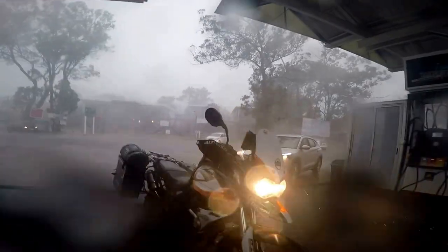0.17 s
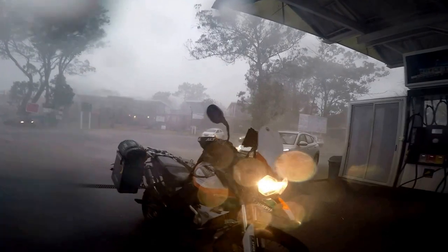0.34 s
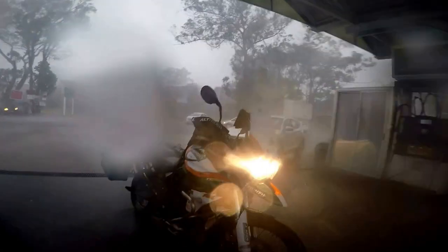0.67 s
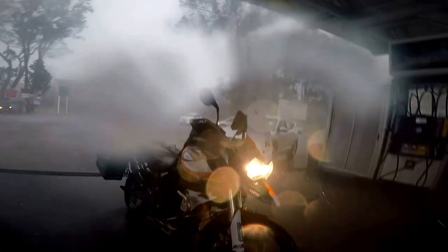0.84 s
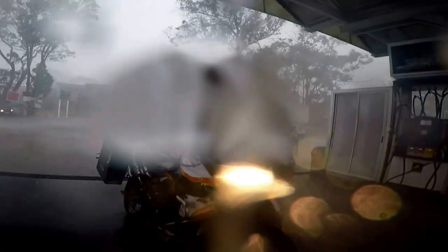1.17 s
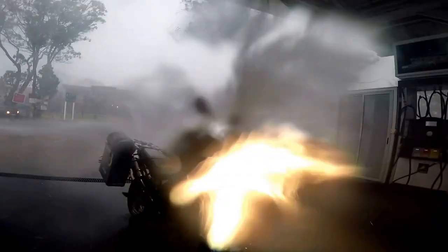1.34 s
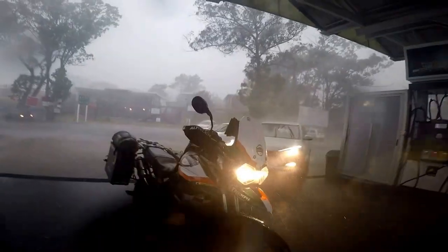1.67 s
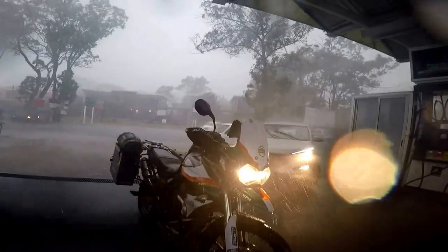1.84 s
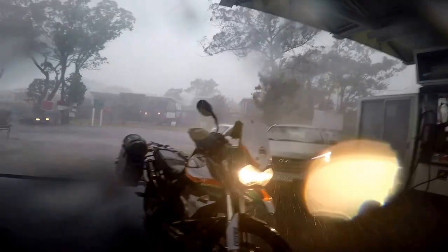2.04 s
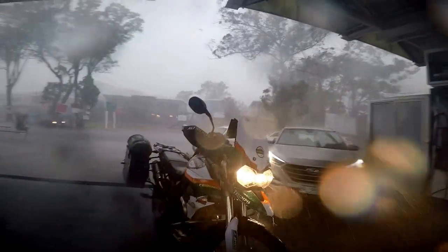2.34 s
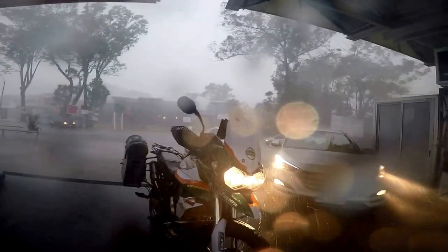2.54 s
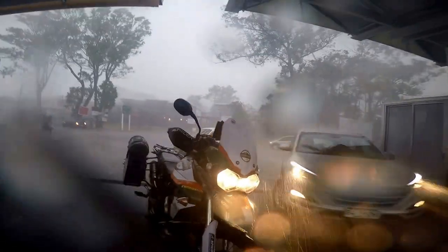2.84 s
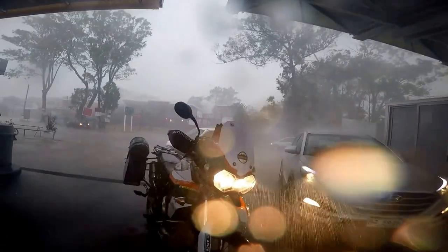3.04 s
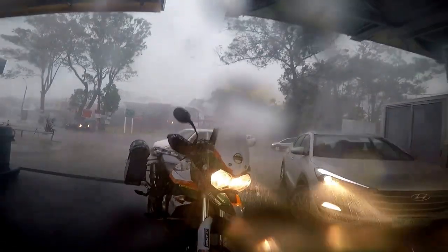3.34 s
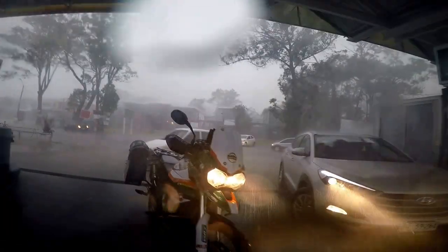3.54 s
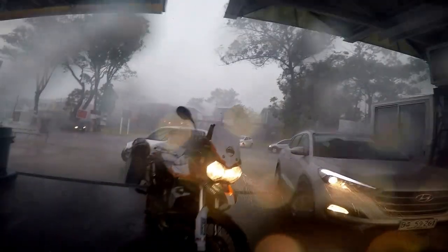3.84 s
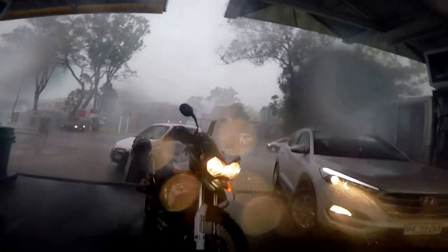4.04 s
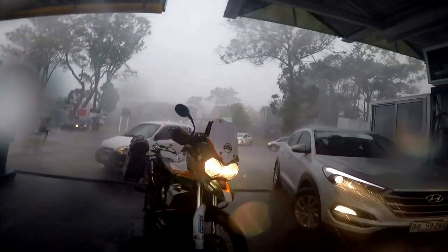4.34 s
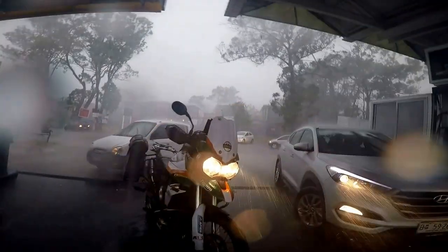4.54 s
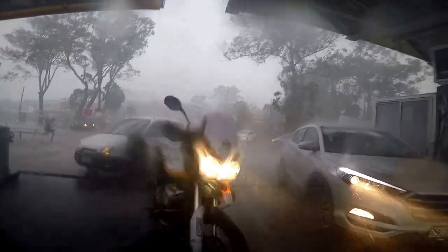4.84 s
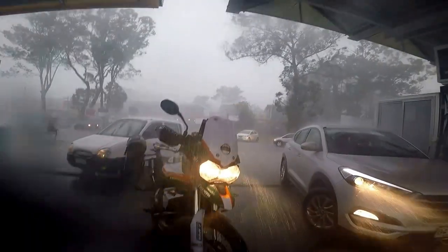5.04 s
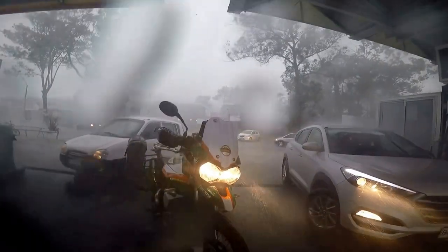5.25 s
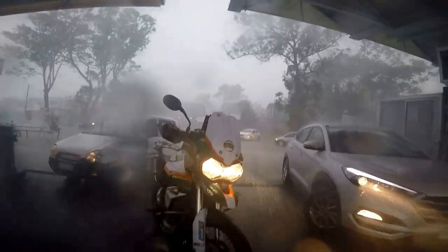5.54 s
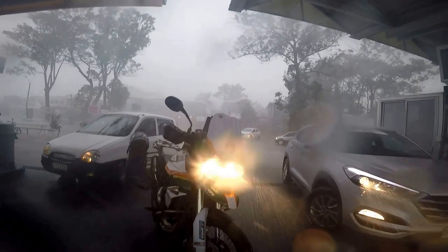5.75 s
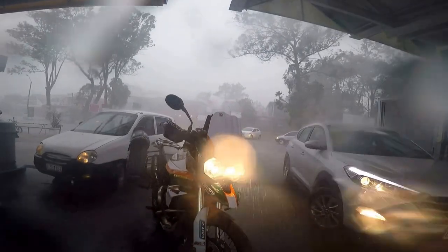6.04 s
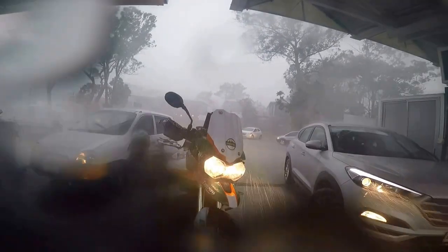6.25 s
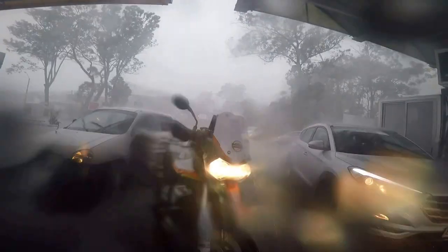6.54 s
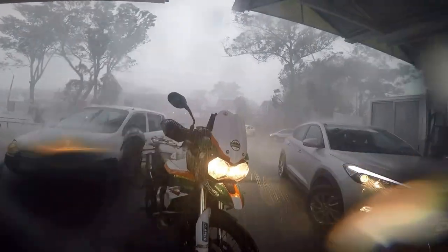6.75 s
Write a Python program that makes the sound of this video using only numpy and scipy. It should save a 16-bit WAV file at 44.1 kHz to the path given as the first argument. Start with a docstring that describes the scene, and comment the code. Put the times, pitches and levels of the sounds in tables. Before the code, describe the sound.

A violent rain and hail storm on a covered forecourt, picked up by a small hard-cased microphone right in the weather. Throughout, a thick flickering roar combines low roof drumming with high hiss, overlaid by fine bright drop ticks and dense pattering of small stones. Wind rumbles in uneven lumps, with hard low punches around 0.4-0.5, 0.8, 1.4, 2.9, 3.8 and strongly at 4.25 seconds. Larger stones clack with short, dry, hollow rings, clustering around 1.6-2.0 and becoming louder from 2.0 to 3.7, then again near 4.5. At 4.65 a heavy wet smack with a thump shuts the sound down; it drains back, reopens at 5.08 and is almost immediately muffled again until 5.4. Knocks follow, then another big splash at 5.6 mutes it until about 6.0. The full roar returns, with a flurry of hail knocks from 6.4 to 6.8 and wind swelling at the end.

```python
"""Hail and heavy rain roar on a forecourt roof, as filtered noise in five flickering bands.
Stones tick on a hard microphone housing and ring its modes; fine drops burst as bright ticks.
Wind buffets and punches the microphone membrane as low noise and spikes; a few blows splash on the port.
Three times roar, small ticks and wind dip, as if water shut the port, and come back abruptly."""
import sys
import numpy as np
from scipy import signal
from scipy.fft import rfft, irfft, next_fast_len
from scipy.io import wavfile
from scipy.ndimage import uniform_filter1d

SR = 44100
rng = np.random.default_rng(int(sys.argv[2]) if len(sys.argv) > 2 else 0)


def bounce(signal):
    """Save signal as a 16-bit WAV file at the path given by the first command-line argument."""
    frames = np.transpose(np.atleast_2d(signal))
    limited = np.clip(frames, -1, 1)
    pcm = np.round(limited * 32767).astype(np.int16)
    wavfile.write(sys.argv[1], SR, pcm)


N = 304731


def undb(db):
    """Amplitude factor of a level in dB."""
    return 10 ** (np.asarray(db) / 20)


def unit(x):
    """x scaled to an RMS of 1."""
    return x / np.sqrt(np.mean(x ** 2))


def peak(x):
    """x scaled to a peak of 1."""
    return x / abs(x).max()


def curve(rows):
    """Columns of a table, joined by straight lines, one value a sample."""
    time_s, *columns = np.transpose(rows)
    return [np.interp(np.arange(N) / SR, time_s, column) for column in columns]


def walk(rate_hz):
    """Random levels held 1 / rate_hz s and smoothed twice."""
    hold = int(SR / rate_hz)
    steps = np.repeat(rng.standard_normal(N // hold + 1), hold)
    return 1.08 * uniform_filter1d(uniform_filter1d(steps, hold), hold)[:N]


def coloured(x, points, lo_hz, hi_hz):
    """x with the spectrum of (frequency [Hz], level [dB]) points, faded in at lo_hz and out at hi_hz."""
    n = next_fast_len(N)
    hz = np.arange(n // 2 + 1) * SR / n + 1e-3  # offset avoids log(0)
    point_hz, point_db = np.array(points).T
    gain = undb(np.interp(np.log(hz), np.log(point_hz), point_db))
    edges = np.sqrt(1 / (1 + (lo_hz / hz) ** 4) / (1 + (hz / hi_hz) ** 4))
    return irfft(rfft(x, n) * gain * edges, n)[:N]


def ring(x, hz, t60_s):
    """One decaying mode driven by x: a complex one-pole resonator."""
    pole = np.exp((2j * np.pi * hz - np.log(1000) / t60_s) / SR)
    return signal.lfilter([1], [1, -pole], x + 0j).imag


def struck(blow, modes, loud_hz, fall_db, damp):
    """Modes rung by blow(hz), fall_db weaker per octave from loud_hz, t60 times damp, pitch jittered."""
    jitter = 1 + 0.04 * rng.standard_normal(len(modes))
    out = 0
    for (hz, mode_db, t60_s), shift in zip(modes, jitter):
        level_db = mode_db - fall_db * abs(np.log2(hz / loud_hz))
        out = out + undb(level_db) * peak(ring(blow(hz), hz * shift, damp * t60_s))
    return peak(out)


def add(out, time_s, sound):
    """Mix sound into out at time_s."""
    i = int(time_s * SR)
    out[i:i + len(sound)] += sound[:N - i]


# water over the port: (shuts [s], clear again [s], nominal depth [dB], clearing time [s])
COVERINGS = [(4.647, 5.083, -22.5, 0.032), (5.09, 5.413, -18, 0.012), (5.61, 6.026, -26, 0.048)]


def dips():
    """Level change in dB while water covers the port: shuts fast, drains slowly, then clears."""
    shut_s, settle_db, settle_s = 0.012, 13.5, 0.04
    drain_db_per_s = 19
    t, out = np.arange(N) / SR, 0
    for shuts_s, clear_s, depth_db, clearing_s in COVERINGS:
        since = t - shuts_s
        cover = np.clip(np.minimum(since / shut_s, (clear_s - t) / clearing_s), 0, 1)
        settling_db = settle_db * np.exp(-abs(since) / settle_s)  # last part of the depth comes slowly
        out = out + cover * (depth_db + drain_db_per_s * since + settling_db)
    return out


# wind buffeting with the port open: (time [s], level [dB])
GUST_LEVELS = [(0.0, -15.5), (0.12, -9.5), (0.26, -21.5), (0.38, -12.5), (0.53, -9.5), (0.6, -22),
               (0.85, -17.5), (1.15, -16), (1.3, -10.5), (1.58, -17), (1.72, -14.5), (1.85, -17.5),
               (2.1, -14), (2.27, -23.5), (2.55, -15), (2.87, -20.5), (2.95, -13), (3.3, -19.5),
               (3.79, -13), (4.05, -21), (4.25, -12), (4.48, -23), (4.57, -15.5), (4.86, -15), (5.0, -27),
               (5.09, -14), (5.35, -21.5), (5.42, -10.5), (5.61, -20.5), (6.1, -31.5), (6.18, -17.5),
               (6.5, -12.5), (6.82, -22), (6.91, -8)]
# relative spectrum of the buffeting: (frequency [Hz], density [dB per Hz])
BUFFET_COLOUR = [(12, -22), (20, 10.5), (45, 1.5), (382, -22.5), (500, -26), (650, -68)]


def wind(dip_db):
    """Eddies push the membrane in lumps; faster flutter follows the lumps in bursts."""
    gust_db = curve(GUST_LEVELS)[0] + 0.69 * dip_db  # dips reach the wind less
    lumps = walk(22)
    slow = coloured(rng.standard_normal(N), BUFFET_COLOUR, 8.8, 123) * undb(3.9 * lumps)
    flutter_db = 3.6 * lumps + 3.8 * walk(45) + 4.5
    flutter = coloured(rng.standard_normal(N), BUFFET_COLOUR, 62.0, 760) * undb(flutter_db)
    push = slow + flutter
    push = push * abs(push) ** 0.19  # sharpens strong eddies
    running_rms = np.sqrt(uniform_filter1d(push ** 2, int(0.1 * SR)))
    return push / running_rms * undb(gust_db)


# strong single eddies: (time [s], signed peak [full scale])
EDDIES = [(0.116, -0.23), (0.373, -0.72), (0.41, -0.6), (0.468, -0.48), (0.49, -0.65), (0.533, 0.49),
          (0.843, 0.64), (1.214, -0.24), (1.236, 0.23), (1.248, -0.44), (1.359, -0.7), (1.671, 0.36),
          (1.768, 0.46), (2.531, 0.32), (2.939, 0.57), (3.787, 0.52), (4.255, -0.84), (5.082, -0.41),
          (5.088, 0.4), (5.101, -0.53)]


def punches():
    """Each eddy is a sharp spike of pressure between two broad rebounds."""
    spike_s, rebound_s = 0.0022, 0.013  # half-widths
    out, t = np.zeros(N), np.arange(-2000, 2000) / SR
    spike = np.exp(-abs(t / spike_s) ** 1.13)
    rebound = 0.39 * np.exp(-(t / rebound_s) ** 2)
    for time_s, push in EDDIES:
        add(out, time_s + t[0], push * peak(spike - rebound))
    return out


def spray(near_db):
    """Fine drops burst close by: equal, thin, bright noise ticks that the dips hide slightly less."""
    count, decay_s = 1100, 0.00074  # decay time constant
    at = (rng.random(count) * N).astype(int)
    ticks = np.bincount(at, minlength=N).astype(float)
    envelope = signal.lfilter([1], [1, -np.exp(-1 / (decay_s * SR))], ticks)
    burst = envelope * rng.standard_normal(N)
    burst = coloured(burst, [(5000, 0), (15000, -12)], 6000, 13000)
    return unit(burst) * undb(0.94 * near_db - 18)


# share of each housing mode in the small ticks, in mode order: (level [dB])
TICK_SHARES = [-15, -8.5, 3, 0, -2.5, -7, -23, -4, -7, 0, -3, -15, -22]


def patter(near_db):
    """Small stones on the housing: mostly faint, a few strong, each ringing its own mix of modes."""
    count = 2100
    at = (rng.random(count) * N).astype(int)
    size = undb(np.minimum(-3.5 * np.log(1 - rng.random(count)), 11))
    mix = rng.standard_normal((len(HOUSING_MODES), count))
    out = 0
    for (hz, _, t60_s), share_db, share in zip(HOUSING_MODES, TICK_SHARES, mix):
        for place, shift in enumerate([0.9, 1, 1.1]):  # where a stone lands shifts the ring
            hits = np.bincount(at[place::3], (size * share)[place::3], N)
            out = out + undb(share_db) * ring(hits, hz * shift, 0.68 * t60_s)
    softened = np.convolve(out, np.hanning(5), "same")
    return unit(softened) * undb(near_db - 1)


# nominal modes of the housing: (frequency [Hz], level [dB], t60 [s])
HOUSING_MODES = [(740, -17, 0.024), (1090, -5.5, 0.03), (1546, -0.5, 0.01), (2248, 6.5, 0.019),
                 (2383, 5.5, 0.02), (2785, 2.5, 0.025), (3400, -2, 0.0059), (3800, 10.5, 0.02),
                 (4250, 3, 0.013), (5550, -2, 0.011), (6930, -5.5, 0.0046), (9650, -13.5, 0.0042),
                 (13000, -27, 0.003)]
# loud stones: (time [s], body peak [dB], favoured ring [Hz], crack re body [dB])
LOUD_STONES = [(0.087, -7.5, 3820, -24), (0.407, -10, 2220, -25), (0.499, -6, 2260, -30),
               (0.7668, -6, 1550, -38), (0.918, -9.5, 2230, -17), (0.9521, -8, 1340, -26),
               (0.9773, -11, 2220, -25), (0.994, -11.5, 2190, -31), (1.1236, -13, 2170, -6),
               (1.5454, -14, 2220, -26), (1.6256, -14, 1330, -24), (1.669, -7, 1700, -26),
               (1.6854, -10, 2210, -29), (1.699, -6, 2200, -32), (1.7359, -9, 2220, -33),
               (1.8945, -7.5, 2240, -34), (1.923, -8, 1440, -30), (1.9837, -10, 2200, -26),
               (2.0637, 1.5, 4060, -34), (2.1932, -1.5, 4050, -38), (2.4149, -6.5, 2110, -28),
               (2.537, -6, 1420, -30), (2.5896, -5, 2480, -31), (2.69, -5.5, 1980, -26),
               (2.781, -1, 2180, -32), (2.8625, 1.5, 2090, -12), (3.0817, -9, 2030, -27),
               (3.151, -8, 4210, -25), (3.2352, 0.5, 2220, -20), (3.347, -16, 2500, -22),
               (3.3627, 0.5, 2260, -34), (3.4021, -1.5, 2320, -31), (3.541, -7, 4030, -29),
               (3.5742, -1.5, 2040, -33), (3.716, -4, 3650, -36), (4.5052, -3, 1550, -24),
               (4.5505, -3.5, 4140, -19), (4.5846, 2.5, 2220, -21), (4.8047, -21, 1800, -31),
               (5.1744, -17, 2150, -27), (5.413, -7.5, 2620, -11), (5.44, 0, 1780, -16),
               (5.4687, -9, 2230, -24), (5.5696, -5, 2350, -18), (6.3916, -7, 2350, -18),
               (6.4254, -3, 2220, -22), (6.5125, -4, 4030, -31), (6.5312, -2.5, 1510, -35),
               (6.5755, -8, 2300, -6), (6.5993, -7.5, 1370, -27), (6.6538, -7, 3860, -29),
               (6.7722, -1, 1670, -34)]


def stones():
    """A short crunch of ice rings the housing, favouring modes near one pitch, and cracks in the treble."""
    out, t = np.zeros(N), np.arange(1500) / SR
    for time_s, peak_db, loud_hz, crack_db in LOUD_STONES:
        grit = rng.standard_normal(len(t)) * np.sqrt(t) * np.exp(-t / 0.0009)
        body = struck(lambda hz: grit, HOUSING_MODES[:-2], loud_hz, 9, 0.5)
        crack = struck(lambda hz: grit, HOUSING_MODES[-3:], 10400, 2.7, 0.91)
        add(out, time_s, undb(peak_db) * (body + undb(crack_db) * crack))
    return out


# blows on the port: (time [s], splash peak [dB], splash t60 at 2200 Hz before ringing [s],
# favoured ring [Hz], crack re splash [dB], thump [dB], thump pitch [Hz])
PORT_BLOWS = [(4.6571, 10, 0.021, 1880, -7, 0.5, 43.4), (5.159, -9, 0.014, 3470, 0.5, -11, 60),
              (5.619, 12.5, 0.019, 3000, -26, 2, 44.6), (5.7047, -3, 0.014, 4070, -4, -35, 60)]


def smacks():
    """Ice or water bursts on the port: a crack, a splash that dulls as it fades and a low membrane thump."""
    out, t = np.zeros(N), np.arange(4000) / SR
    for time_s, splash_db, t60_s, loud_hz, crack_db, thump_db, thump_hz in PORT_BLOWS:
        hiss = rng.standard_normal(len(t))
        noise = np.convolve(hiss, np.hanning(5), "same")
        snap = hiss * np.exp(-t / 0.00064)

        def fading(hz):
            """Noise that dies sooner for higher modes."""
            return noise * 1000.0 ** (-t * (hz / 2200) ** 0.55 / t60_s)

        crack = struck(lambda hz: snap, HOUSING_MODES[-3:], 9000, 0, 0.75)
        splash = struck(fading, HOUSING_MODES, loud_hz, 15, 0.29)
        thump = np.sin(2 * np.pi * thump_hz * t) * np.exp(-t / (0.59 * t60_s))
        burst = undb(splash_db) * (splash + undb(crack_db) * crack)
        add(out, time_s, burst + undb(thump_db) * thump)
    return out


# relative spectrum of the roar through the housing: (frequency [Hz], density [dB per Hz])
ROAR_COLOUR = [(250, -18), (450, -6.5), (690, 3.5), (1000, -10), (1800, -17.5), (2500, -25), (3250, -31),
               (4000, -16.5), (5800, -19.5), (6500, -31.5), (7100, -28.5), (8600, -34.5), (9300, -46.5),
               (11000, -39), (15000, -48.5)]


def roar(drum_db, hiss_db):
    """Countless drops on roof and ground: low drumming and high hiss as noise bands that flicker apart."""
    edges_hz = [100, 1000, 1900, 3200, 6500, 30000]
    flickers_db = [1.78, 0.8, 3.6, 1.14, 1.9]
    swell, scale, out = walk(9.5), None, 0
    for lo_hz, hi_hz, flicker_db in zip(edges_hz, edges_hz[1:], flickers_db):
        band = coloured(rng.standard_normal(N), ROAR_COLOUR, lo_hz, hi_hz)
        if scale is None:
            scale = 1 / band.std()  # the lowest band sets the scale for all
        share = np.clip(np.log(lo_hz / 600) / np.log(5), 0, 1)  # higher bands follow the hiss more
        band_db = (1 - share) * drum_db + share * (hiss_db + 10.5)
        out = out + scale * band * undb(band_db + 0.097 * swell + flicker_db * walk(30))
    return out


# storm with the port open: (time [s], nominal drumming level [dB], nominal hiss level [dB])
STORM = [(0.0, -21, -30), (0.79, -22.5, -35.5), (1.15, -21.5, -29.5), (1.7, -21, -33), (1.9, -21, -31),
         (2.5, -19, -27.5), (3.07, -18, -27.5), (3.66, -21.5, -29.5), (4.31, -18, -27), (4.65, -20, -29),
         (5.09, -20.5, -31.5), (5.5, -19, -27), (6.05, -23, -31.5), (6.3, -19, -30.5), (6.91, -21.5, -28.5)]
# flurries of small stones and drops: (time [s], level re hiss [dB])
FLURRIES = [(0.0, 1.5), (0.55, 2.5), (0.65, 6), (1.45, -3.5), (1.7, 5), (2.1, -4), (3.0, -4.5), (3.2, 4.5),
            (3.5, 5), (3.75, -6.5), (4.5, 1.5), (5.5, 5), (6.2, 2), (6.45, 5.5), (6.91, 2.5)]


def scene():
    """Dips shape wind, roar and small ticks; loud stones, smacks and punches pass undipped."""
    dip_db = dips()
    drum_db, hiss_db = curve(STORM)
    hiss_db = hiss_db + 0.97 * dip_db
    near_db = hiss_db + curve(FLURRIES)[0]
    gusts = wind(dip_db) + punches()
    hits = spray(near_db) + patter(near_db) + stones() + smacks()
    return (gusts + hits + roar(drum_db + dip_db, hiss_db))[None]


def record(dry):
    """The input clips just below full scale, then a steep low-pass cuts the top."""
    top = signal.ellip(10, 0.2, 75, 15200, fs=SR, output="sos")  # ripple dB, stopband dB, cutoff Hz
    return signal.sosfilt(top, np.clip(dry, -0.93, 0.93))


dry = scene()
out = record(dry)
bounce(out)
```